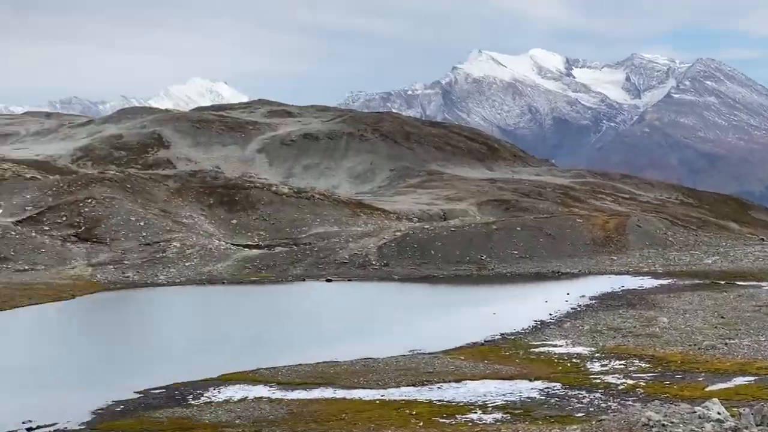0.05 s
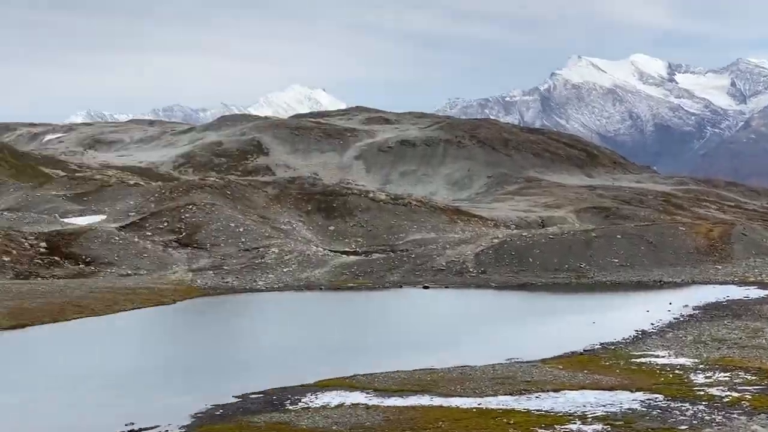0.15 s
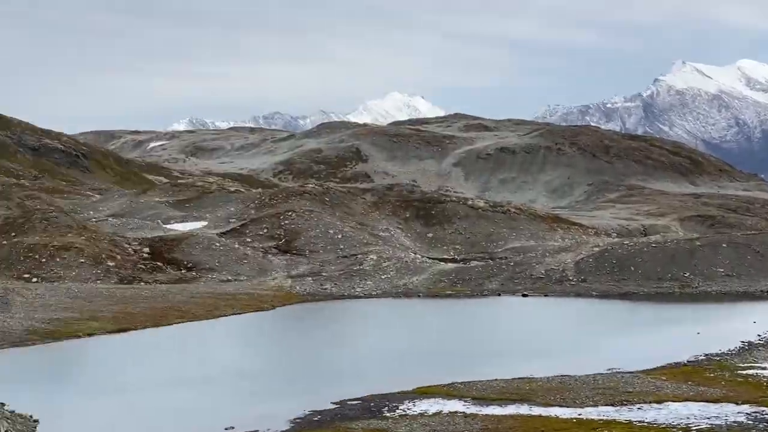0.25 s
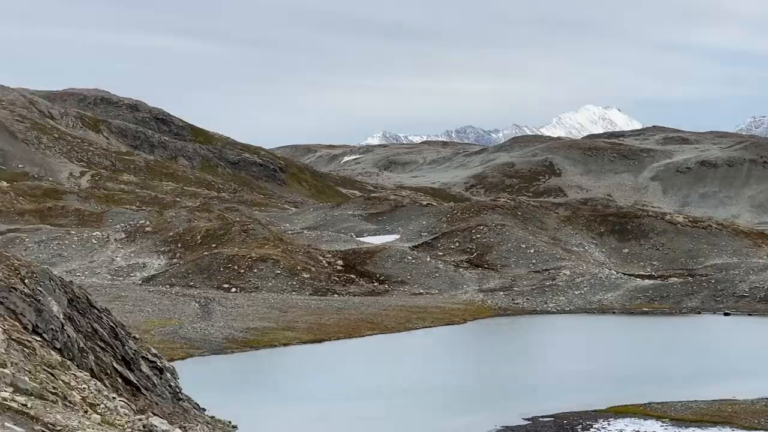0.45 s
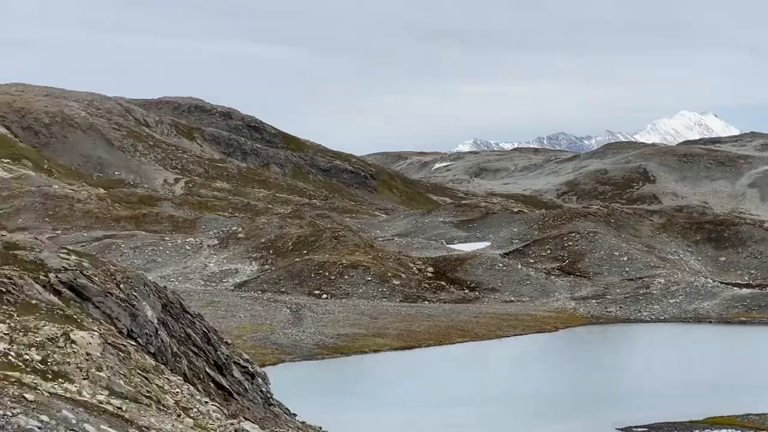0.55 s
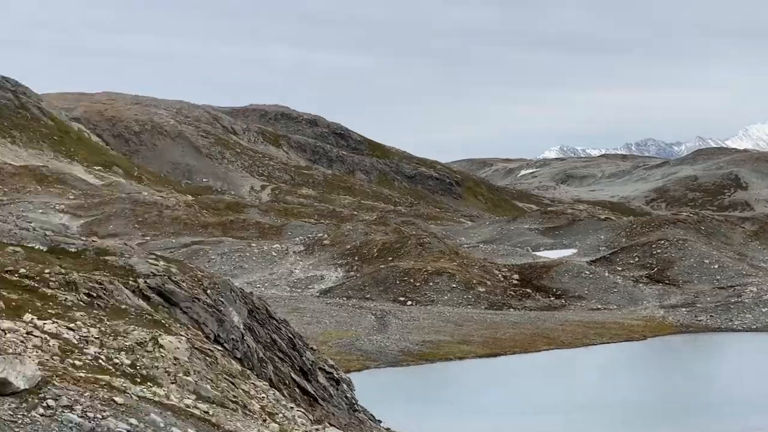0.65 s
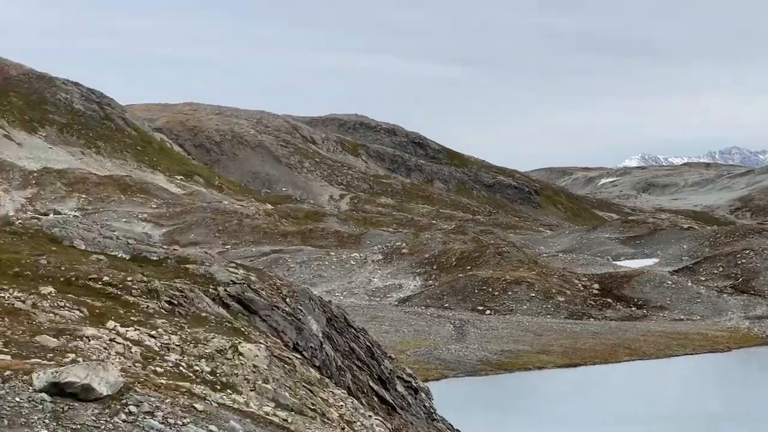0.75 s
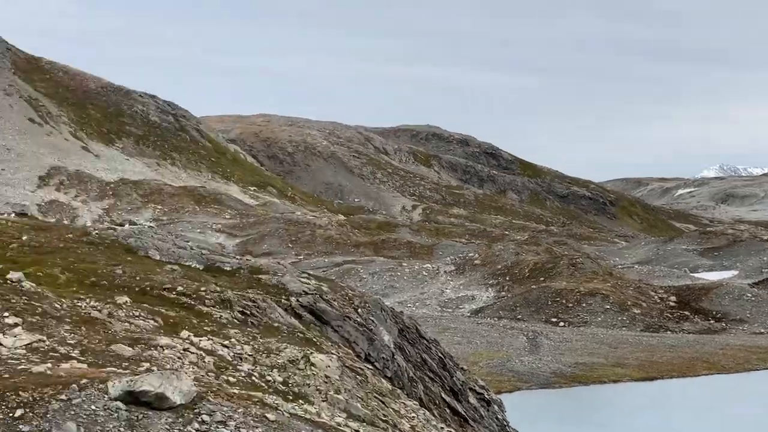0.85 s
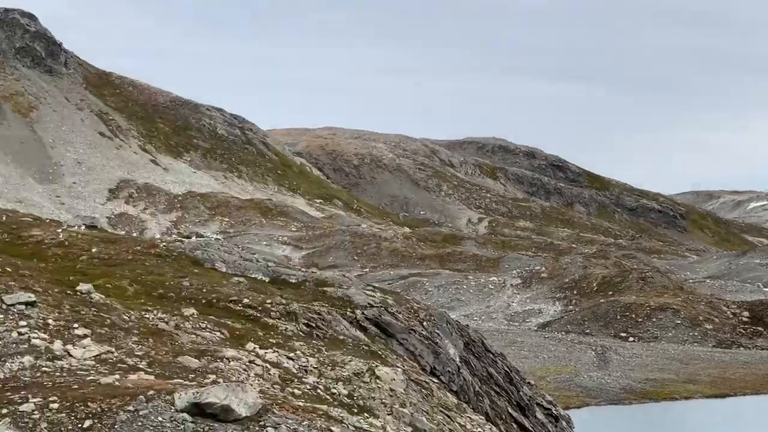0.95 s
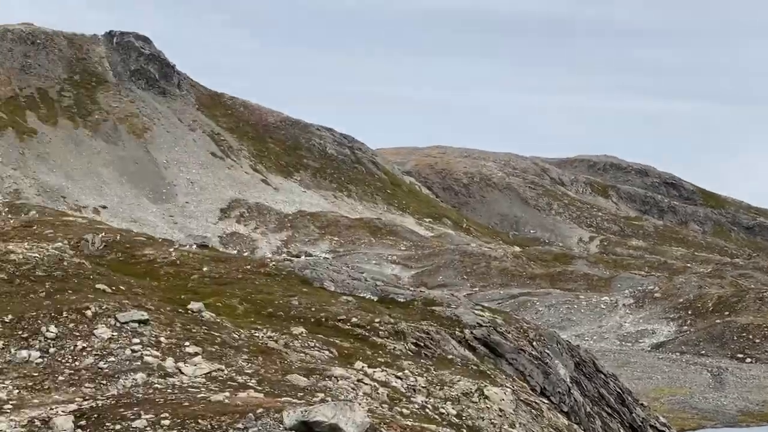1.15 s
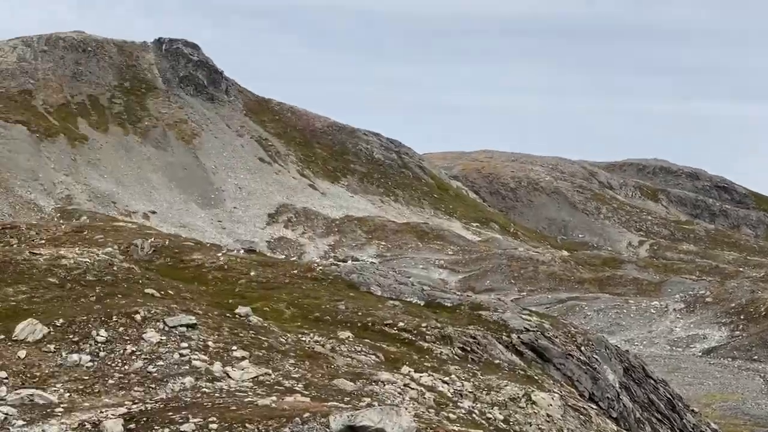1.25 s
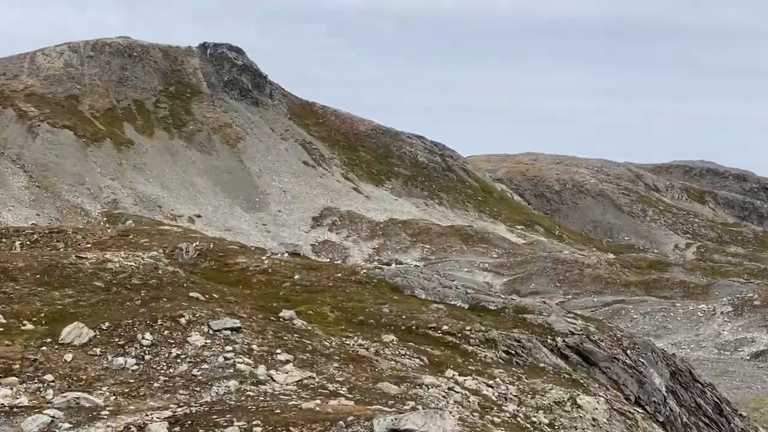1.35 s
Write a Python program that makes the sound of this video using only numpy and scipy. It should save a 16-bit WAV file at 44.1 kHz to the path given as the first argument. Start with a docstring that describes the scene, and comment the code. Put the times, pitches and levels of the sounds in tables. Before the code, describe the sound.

A ptarmigan gives one dry, rattling croak on open tundra from about 0.4 to 1.4 seconds. Its clicks run fast, then turn slower and louder from around 0.9 seconds. Wind rumbles on the microphone, thumping hardest between 0.4 and 1 second. Close by, a jacket softly scuffs around 0.1 to 0.2 seconds and rustles near 0.9, with scattered grit ticks over a faint hush.

```python
"""One dry, rattling croak carries across open tundra, fast at first, then slower and louder.
It is a ptarmigan: its voice box snaps over and over, and each snap rings its throat like a click.
Close by, a jacket rustles and scuffs as the microphone is swung round, and bits of grit tick.
Wind rumbles and thumps on the microphone over a faint hush of open air."""
import sys
import numpy as np
from scipy import signal
from scipy.fft import rfft, irfft
from scipy.io import wavfile

SR = 44100
rng = np.random.default_rng(int(sys.argv[2]) if len(sys.argv) > 2 else 0)


def unload_wav(signal):
    """Save mono or channel-first audio to the path in sys.argv[1] as 16-bit WAV at rate SR, clipped to [-1, 1]."""
    wavfile.write(
        sys.argv[1],
        SR,
        np.round(np.clip(np.atleast_2d(signal).T, -1, 1) * 32767).astype(np.int16),
    )


N = 61739


def undb(db):
    """Turn decibels into a factor to multiply by."""
    return 10 ** (np.asarray(db) / 20)


def curve(rows, at):
    """Read a value off straight lines drawn through (x, value) rows."""
    return np.interp(at, *np.array(rows).T)


def clock():
    """The time of every sample, in seconds."""
    return np.arange(N) / SR


def colour(x, points):
    """Make some pitches louder and others softer, following (frequency [Hz], level [dB]) points."""
    hz, db = np.array(points).T
    f = np.maximum(np.fft.rfftfreq(N, 1 / SR), 1)
    return irfft(rfft(x) * undb(np.interp(np.log(f), np.log(hz), db)), N)


def unit(x):
    """Scale a sound so that its typical size (rms) is 1."""
    return x / np.std(x)


def stereo(mid, side):
    """Make left and right: mid is what both ears share, side is what sets them apart."""
    return np.array([mid + side, mid - side])


def wide_noise(tone, side_db):
    """Stereo noise with the given tone; a higher side_db sounds wider."""
    mid, side = (unit(colour(rng.standard_normal(N), tone)) for _ in range(2))
    return stereo(mid, undb(side_db) * side)


def burst(start, rise_s, decay_s):
    """A loudness shape that climbs straight to 1, then dies away."""
    age = np.maximum(clock() - start, 0)
    return np.minimum(age / rise_s, 1) * np.exp(-np.maximum(age - rise_s, 0) / decay_s)


def open_air(level_db=-70):
    """Open air makes a faint, steady hush."""
    # tone of the hush (frequency [Hz], level [dB])
    tone = [(100, 5.5), (300, -3.5), (600, -13), (1100, -8), (1800, -26), (2500, -21.5), (4000, -34),
            (7500, -33.5), (9000, -39), (12000, -39.5), (15000, -62)]
    return undb(level_db) * wide_noise(tone, side_db=-4.5)


def wind_buffets(rise_s=0.0038, sink_s=0.018, rest_hz=53.5, side_db=-10.5):
    """Puffs of wind hit the microphone; each thump sinks in pitch as it dies."""
    # the puffs (time [s], peak level [dB], starting pitch [Hz], decay [s])
    puffs = [(0.192, -45.5, 166, 0.008), (0.221, -42, 76.4, 0.06), (0.44, -33, 153.4, 0.026),
             (0.473, -34, 101.6, 0.021), (0.523, -35.5, 73.7, 0.036), (0.544, -45.5, 151, 0.018),
             (0.605, -35, 123, 0.035), (0.647, -29, 152.4, 0.021), (0.672, -28.5, 171, 0.012),
             (.71, -38, 88, 0.05), (0.743, -48, 278, 0.031), (0.819, -42.5, 70.7, 0.092),
             (0.929, -47, 171, 0.053), (.978, -30.5, 129.6, 0.015), (.989, -31.5, 144.7, .014),
             (1.009, -34.5, 60, 0.0088), (1.135, -43, 131.6, 0.014), (1.185, -50.5, 92, 0.018),
             (1.235, -44.5, 113, 0.006), (1.345, -47, 141, 0.0068), (1.357, -44, 233, 0.0072)]
    t, thumps = clock(), np.zeros(N)
    for start, db, hz, decay_s in puffs:
        age = np.maximum(t - start, 0)
        cycles = rest_hz * age + (hz - rest_hz) * sink_s * (1 - np.exp(-age / sink_s))
        thumps -= undb(db) * burst(start, rise_s, decay_s) * np.sin(2 * np.pi * cycles)
    shifted = np.imag(signal.hilbert(thumps))  # every wave moved by a quarter cycle, for width
    return stereo(thumps, undb(side_db) * shifted)


def wind_rumble():
    """Wind on the microphone makes a low rumble that swells and eases."""
    # strength of the wind (time [s], level [dB])
    strength = [(0, -60), (.2, -59), (.4, -61.5), (.5, -53.5), (.75, -62.5), (.93, -48.5), (1.08, -56.5),
                (1.4, -54.5)]
    # tone of the rumble (frequency [Hz], level [dB])
    tone = [(20, -30), (38, 1), (60, 6), (90, -4.5), (150, -11), (300, -26), (800, -72)]
    return wide_noise(tone, side_db=-7) * undb(curve(strength, clock()))


def fibres(grain_db=3.5):
    """Fabric fibres make a mass of tiny clicks, a few much stronger than the rest."""
    # tone of the fabric (frequency [Hz], level [dB])
    tone = [(300, 4.5), (900, 10.5), (2000, 5.5), (3800, 3.5), (5000, -2.5), (7000, -1), (8500, -9.5),
            (11500, -10.5), (13500, -24), (15500, -15)]
    sizes = undb(grain_db * np.minimum(rng.exponential(size=N), 2 * np.pi))
    return unit(colour(rng.standard_normal(N) * sizes, tone))


def crackle(unrelated_share=0.14):
    """Close fibres sound wide: left and right get partly shifted waves, partly unrelated clicks."""
    # stereo width of the fabric (frequency [Hz], side level [dB])
    width = [(500, -7), (2000, -28), (3500, -4), (5500, -29), (7500, -12), (9500, -1.5), (14000, 2)]
    mid = fibres()
    shifted = np.imag(signal.hilbert(mid))
    side = np.sqrt(1 - unrelated_share) * shifted + np.sqrt(unrelated_share) * fibres()
    return stereo(mid, colour(side, width))


def jacket():
    """As the jacket slides, its fibres catch and slip over a dull rub of cloth."""
    # sliding of the jacket (time [s], level [dB])
    sliding = [(0, -76), (.09, -72.5), (.125, -70), (.18, -69.5), (.225, -87), (.3, -100), (.72, -86),
               (.8, -67), (.835, -58), (.885, -64.5), (.915, -55), (.94, -65), (.965, -58), (1.0, -68),
               (1.06, -81.5), (1.17, -76.5), (1.28, -93), (1.355, -70), (1.4, -79.5)]
    # rubbing of the cloth (time [s], level [dB])
    rubbing = [(0, -66), (.06, -60.5), (.1, -62.5), (.15, -55.5), (.19, -60.5), (.22, -65.5), (.35, -68.5),
               (.58, -70), (.625, -65.5), (.67, -69.5), (.85, -65.5), (.97, -62), (1.08, -78), (1.22, -65),
               (1.4, -73.5)]
    # tone of the rub (frequency [Hz], level [dB])
    rub_tone = [(80, -14), (200, 0), (400, -1.5), (800, -5), (1200, -13), (1800, -12), (2400, -38),
                (6000, -52)]
    rustle = crackle() * undb(curve(sliding, clock()))
    rub = wide_noise(rub_tone, side_db=-6) * undb(curve(rubbing, clock()))
    return rustle + rub


def flicks(width_share=0.47, rise_share=0.6):
    """Grit ticks and fabric swishes, each a broad band of crackle around its own pitch."""
    # the ticks and swishes (time [s], level [dB], decay [s], centre pitch [Hz])
    events = [(0.106, -61, 0.001, 7000), (0.1202, -62, 0.0013, 6200), (0.133, -67.5, 0.031, 5300),
              (0.1853, -66.5, 0.002, 3100), (0.37, -77.5, 0.0074, 3200), (0.397, -81, 0.022, 4300),
              (.462, -63, 0.0019, 5000), (0.464, -65, 0.0019, 9400), (.468, -69, 0.0058, 7000),
              (0.606, -71.5, 0.023, 3840), (.605, -73, .009, 10000), (0.631, -78, 0.00065, 4500),
              (0.639, -74, 0.0013, 3900), (0.648, -69, 0.00072, 4500), (0.719, -66, 0.00064, 3700),
              (0.766, -67.5, 0.0088, 6000), (1.0223, -58, 0.0012, 3000), (1.152, -66, 0.0027, 6160),
              (1.334, -74, 0.0011, 7500), (1.353, -56, 0.0015, 4600)]
    out, grains = np.zeros((2, N)), crackle()
    for start, db, decay_s, hz in events:
        band = signal.lfilter(*signal.iirpeak(hz, 1 / width_share, fs=SR), grains)
        band /= np.std(band.mean(axis=0))
        out += band * undb(db) * burst(start, rise_share * decay_s, decay_s)
    return out


def scuffs(side_db=-8, tap_db=19, top_hz=3800):
    """Cloth and grit scuff with a tap and a brief scrape, from hollow knocks to dry clacks."""
    # the scuffs (time [s], level [dB], centre pitch [Hz], decay [s], band width [share of the pitch])
    events = [(.1105, -50.5, 760, 0.0019, 0.3), (0.1196, -46.5, 834, 0.003, 0.29),
              (0.179, -46.5, 670, 0.0036, 0.59), (0.1852, -52, 850, 0.0081, 0.61),
              (0.373, -48.5, 1190, 0.0014, 0.59), (0.374, -50, 603, 0.0035, 0.61),
              (0.3785, -53, 970, 0.0016, 0.61), (0.611, -57.5, 1140, 0.0063, 0.69),
              (0.624, -56, 1250, 0.0026, 0.23), (0.6324, -50, 1040, 0.00087, 0.77),
              (0.64, -47.5, 880, 0.0011, 2), (0.74, -51.5, 560, 0.0034, 1.2),
              (.772, -48.5, 714, 0.0023, 0.67), (0.868, -57.5, 670, 0.026, 0.4),
              (0.883, -55, 574, 0.016, 0.56), (0.932, -55, 1290, 0.00041, 0.94),
              (1.013, -62.5, 410, 0.039, 1.3)]
    out = np.zeros((2, N))
    for start, db, hz, decay_s, width in events:
        shape = burst(start, rise_s=0.0008, decay_s=decay_s)
        push = shape * rng.standard_normal((2, N))
        push[0, np.argmax(shape)] += undb(tap_db)  # the tap lands at the peak
        band = signal.iirpeak(hz, 1 / width, fs=SR)
        scrape = signal.lfilter(*band, signal.lfilter(*band, push + 1e-18))
        scrape = signal.lfilter(*signal.butter(2, top_hz, fs=SR), scrape)
        mid, side = scrape * np.linalg.norm(shape) / np.linalg.norm(scrape, axis=1, keepdims=True)
        out += undb(db) * stereo(mid, undb(side_db) * side)
    return out


def ground_echo(voice, echo_db=-15, fade_s=0.13, side_db=-25.5):
    """The voice plus a short echo scattered by stony ground, which falls 60 dB in fade_s."""
    scatter = rng.standard_normal((2, N)) * burst(0.003, rise_s=0.0083, decay_s=fade_s / np.log(1000))
    mid, side = (undb(echo_db) * signal.fftconvolve(voice, s / np.linalg.norm(s))[:N] for s in scatter)
    return stereo(voice + mid, undb(side_db) * side)


def throat_click(start, effort_db, flat_share=0.065, rise_s=0.0028, scatter_db=0.7, jitter=0.007):
    """One snap rings the throat at several pitches, which start a little flat and rise."""
    # tension of the throat (time [s], pitch [factor])
    tension = [(.40, 0.9), (.45, 0.98), (.53, 1.03), (.75, 1.027), (1.05, 1.01), (1.3, 1.016),
               (1.345, 0.996), (1.37, 0.95)]
    # the throat's ringing tones (pitch [Hz], level [dB], time to fall 60 dB [s])
    tones = [(1115, -10, 0.023), (1610, -16, 0.002), (1760, -26, 0.0031), (2109, -3.5, 0.021),
             (2540, -26.5, 0.038), (2820, -23.5, 0.047), (3125, -24.5, 0.04), (4750, -14, 0.0033)]
    # a harder push makes a brighter click (effort [dB], treble limit [Hz])
    brightness = [(-55, 2840), (-47, 3080)]
    age = np.arange(SR // 25) / SR
    bend = curve(tension, start) * (1 - flat_share * np.exp(-age / rise_s))
    angle = 2 * np.pi * np.cumsum(bend) / SR
    ring = 0
    for k, (hz, db, fade_s) in enumerate(tones):
        level_chance, pitch_chance = rng.standard_normal(2)  # no two clicks are quite alike
        direction = 1 if k < 2 else -1  # the lowest two tones swing against the rest
        size = direction * undb(db + scatter_db * level_chance)
        fade = np.exp(-np.log(1000) * age / fade_s)
        ring += size * fade * np.sin(hz * (1 + jitter * pitch_chance) * angle)
    return signal.lfilter(*signal.butter(4, curve(brightness, effort_db), fs=SR), ring)


def ptarmigan(scatter_db=0.6):
    """The bird's voice box (syrinx) snaps so quickly that the clicks join into a croak."""
    # speed of the rattle (time [s], rate [clicks per second])
    rattle = [(.3983, 47.02), (.49, 54.64), (.79, 55.48), (.83, 51.17), (.895, 51.17), (.915, 38.45),
              (.99, 40.17), (1.2, 39.75), (1.4, 30.94)]
    # how hard the bird pushes (time [s], level [dB])
    effort = [(.40, -54), (.445, -46), (.5, -53.5), (.6, -53.5), (.72, -51), (.81, -50), (.97, -50.5),
              (1.06, -45.5), (1.33, -44.5), (1.375, -48)]
    t, voice = clock(), np.zeros(N)
    count = np.cumsum(curve(rattle, t) * (t >= rattle[0][0])) / SR
    # a click starts each time the count passes a whole number
    onsets = np.searchsorted(count, np.arange(int(count[-1]) + 1), side="right")
    for first, chance in zip(onsets, rng.standard_normal(len(onsets))):
        effort_db = curve(effort, t[first])
        click = throat_click(t[first], effort_db)[:N - first]
        voice[first:first + len(click)] += click * undb(effort_db + scatter_db * chance)
    return voice


def scene():
    """The bird and its echo, the wind, the jacket and the grit over the hush of open air."""
    croak = ground_echo(ptarmigan())
    return croak + wind_buffets() + wind_rumble() + jacket() + flicks() + scuffs() + open_air()


def record(dry):
    """Cut away the very highest treble."""
    top_hz = 15750
    return signal.sosfilt(signal.ellip(10, 0.2, 70, top_hz, fs=SR, output="sos"), dry)


dry = scene()
out = record(dry)
unload_wav(out)
```